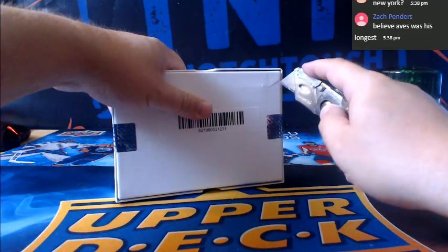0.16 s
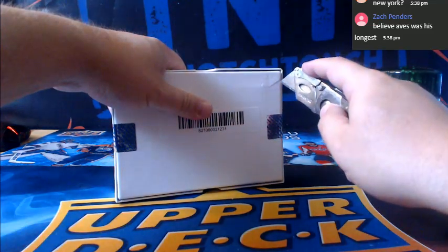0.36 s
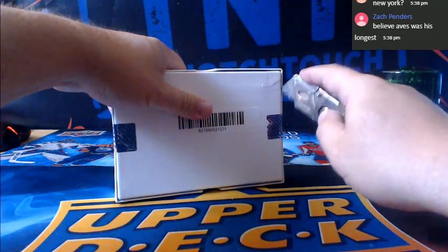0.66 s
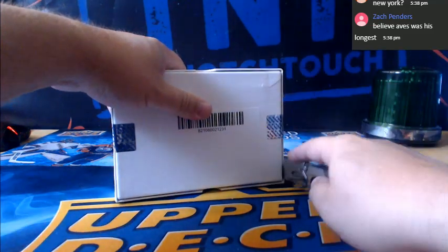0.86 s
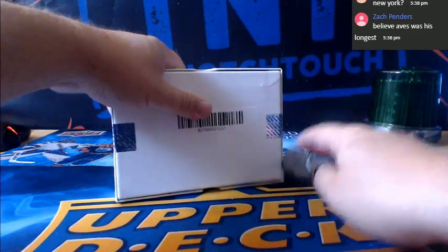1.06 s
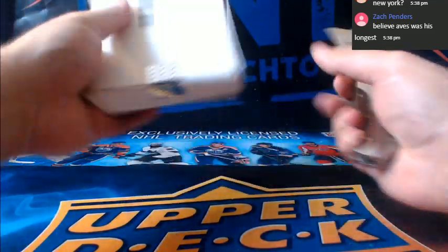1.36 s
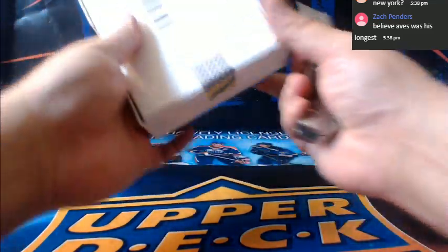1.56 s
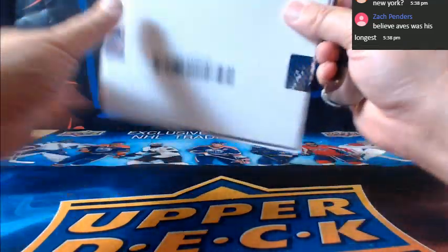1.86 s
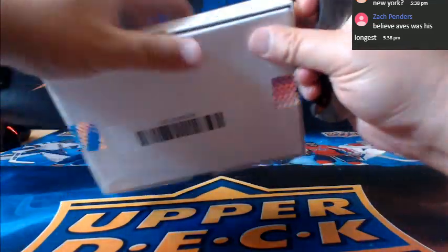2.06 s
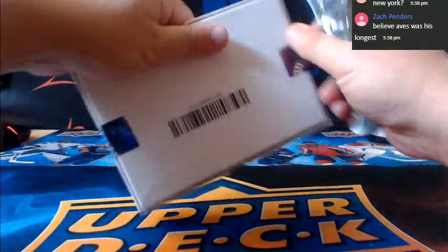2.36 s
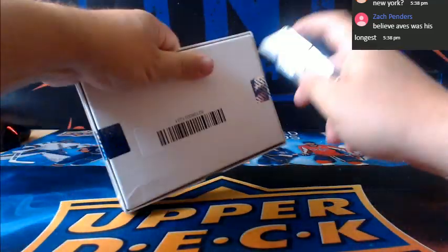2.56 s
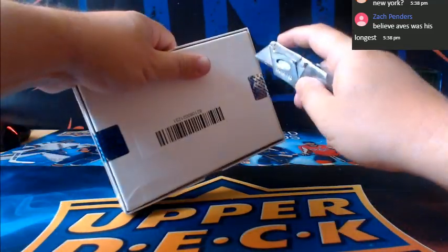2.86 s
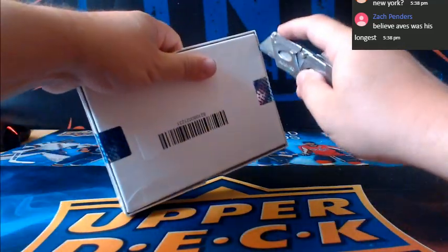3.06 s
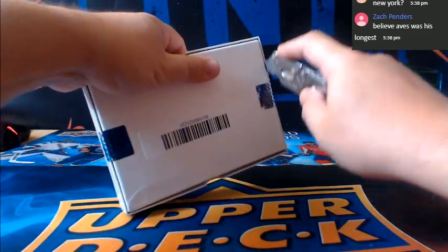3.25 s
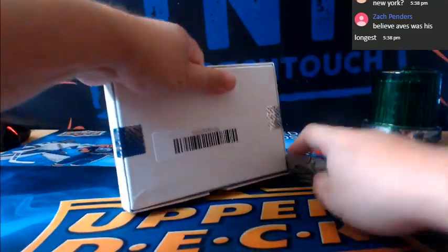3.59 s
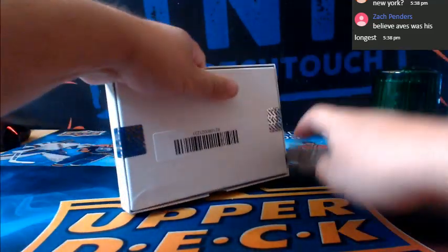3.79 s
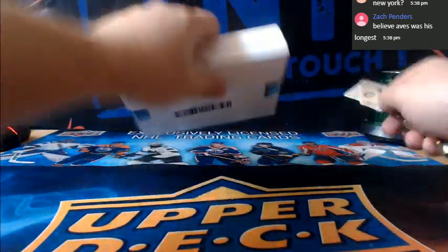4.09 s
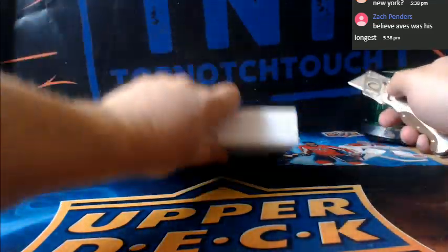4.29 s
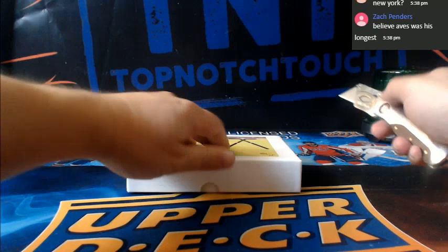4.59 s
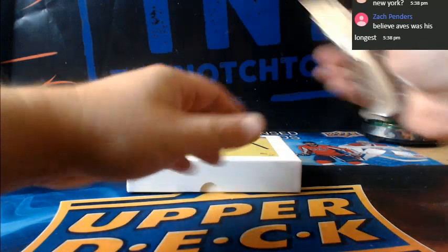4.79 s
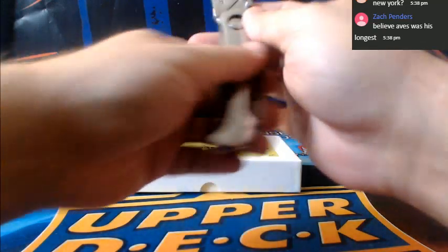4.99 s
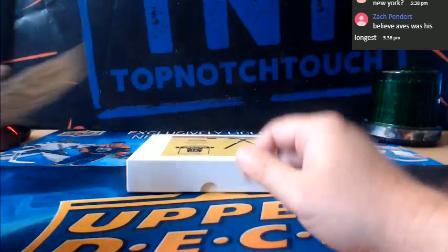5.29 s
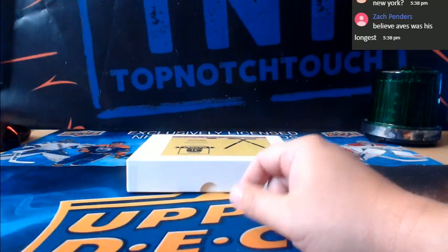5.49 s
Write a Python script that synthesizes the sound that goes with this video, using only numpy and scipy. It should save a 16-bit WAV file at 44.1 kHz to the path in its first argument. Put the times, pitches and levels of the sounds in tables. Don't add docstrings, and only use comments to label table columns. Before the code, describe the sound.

A small, quiet room with low building rumble, a soft fan and microphone hiss, heard close through a webcam. Faint card ticks until 0.5 s, when a blade enters and rasps; at 0.66-0.7 s the tape snaps sharply and the hand thuds against the hollow box, leaving a short creak. From 0.9 to 2.1 s fingers rub and tick on glossy card, with small squeaks, clearest around 1.2-1.35 and 2.0 s. A grip click comes at 2.47 s, then light ticks. From 3.0 s the blade saws the second seal, pressing harder until cracks at 3.3-3.4 s. Soft rubbing and a faint high chirp follow near 3.9 s. The box edge knocks down at 4.13 s and it lands flat with a hollow clap at 4.34 s. Faint steel rattles at 4.5-4.6 s, then near quiet. At 5.57 s the knife hits wood, bouncing at once in a hard, ringing double knock with chatter.

```python
import sys
import numpy as np
from scipy import signal
from scipy.fft import rfft, irfft, next_fast_len
from scipy.io import wavfile
from scipy.ndimage import uniform_filter1d, map_coordinates

SR = 44100
rng = np.random.default_rng(int(sys.argv[2]) if len(sys.argv) > 2 else 0)


def undo_db(level):
    steps = np.asarray(level, float) / 20
    return 10 ** steps


def put_to_file(sound):
    columns = np.atleast_2d(sound).T
    safe = np.clip(columns, -1, 1)
    whole_steps = np.round(safe * 32767)
    wavfile.write(sys.argv[1], SR, whole_steps.astype(np.int16))


N = 248591


def unit(x):
    return x / np.sqrt(np.mean(x ** 2) + 1e-20)


def along(points, hz):
    f, v = np.transpose(points)
    return np.interp(np.log(hz + 1), np.log(f + 1), v)


def wobble(rate):
    return map_coordinates(rng.standard_normal(int(N * rate / SR) + 4), [np.arange(N) * rate / SR])


def filtered(x, response):
    m = next_fast_len(len(x) + SR // 2)
    return irfft(rfft(x, m) * response(np.fft.rfftfreq(m, 1 / SR)), m)[:len(x)]


def body(modes):
    def response(f):
        total = 0
        for k, (centre, width, db) in enumerate(modes):
            damping = 1j * f * width
            total = total + (-1) ** k * undo_db(db) * damping / (centre * centre - f * f + damping)
        return total
    return response


def noise(spectrum, grain_db=0, patchy_db=0):
    grains = rng.standard_normal(N) * undo_db(grain_db * wobble(900))
    z = signal.stft(grains, nperseg=256)[2]
    field = uniform_filter1d(rng.standard_normal(z.shape), size=6, axis=0)
    field = uniform_filter1d(field, size=10, axis=1)
    grit = signal.istft(z * undo_db(patchy_db * unit(field)), nperseg=256)[1][:N]
    return unit(filtered(grit, lambda hz: undo_db(along(spectrum, hz)) * (hz > 0)))


def push(length, t):
    return np.sin(np.pi * np.clip(t / length, 0, 1)) ** 2


def stroke(s, length, attack, sag, release):
    gain, u = np.zeros(N + SR), np.arange(SR // 2) / SR
    fall_db = -sag * np.minimum(u, length) - release * np.maximum(u - length, 0)
    gain[round(s * SR):][:len(u)] = np.clip(u / attack, 0, 1) * undo_db(fall_db)
    return gain[:N]


# frequency in Hz, level in dB per Hz.
RUMBLE_SPECTRUM = [(2, -38), (6, 2.5), (11, 4), (19, -12), (24, -16), (30, -22), (38, -8), (45, -22),
                   (60, -27), (80, -25.5), (110, -65)]
# frequency in Hz, level in dB per Hz.
AIR_SPECTRUM = [(41, -39), (70, -2), (126, 2.5), (169, -6.5), (199, -13.5), (342, -10), (551, -20.5),
                (774, -22), (848, -15), (1560, -26), (1710, -24), (2580, -35.5), (7650, -39), (13200, -47),
                (15800, -60)]


def room_tone():
    rumble = undo_db(-40) * noise(RUMBLE_SPECTRUM)
    air_db = -57.5 + 0.67 * wobble(2.82)
    return rumble + undo_db(air_db) * noise(AIR_SPECTRUM)


# frequency in Hz, time to fall 60 dB in seconds.
ROOM_DECAY = [(150, 0.4), (1000, 0.23), (4000, 0.22), (12000, 0.12)]


def walls(x):
    hz, t, z = signal.stft(rng.standard_normal(SR // 2), SR, nperseg=256)
    fading = z * undo_db(-60 * t / along(ROOM_DECAY, hz)[:, None])
    tail = signal.istft(fading, SR, nperseg=256)[1]
    delayed = np.pad(x, (150, 0))
    echo = signal.fftconvolve(delayed, tail / np.linalg.norm(tail))[:N]
    return filtered(echo, lambda f: (1j * f / (160 + 1j * f)) ** 2)


DROP_TIMES = [
    5.5676,
    5.60385,
]
# ring in dB, crack in dB, contact length in seconds.
DROP_BLOWS = [
    (-10.5, -25, 0.00041),
    (-9.5, -20, 0.00026),
]
# frequency in Hz, width in Hz, level in dB.
DESK_MODES = [
    [(221, 70, -8), (474, 160, -5), (520, 60, -10), (624, 45, -10), (816, 64, -2), (1013, 21, -5),
     (1093, 16, -5.5), (1312, 44, 2), (1740, 220, -7.5), (2000, 170, -13), (2530, 220, -21),
     (3350, 270, -6), (4340, 510, -12), (6000, 800, -19)],
    [(241, 74, -3), (460, 120, -13), (634, 59, -6.5), (953, 44, -0.5), (1130, 53, -7), (1234, 86, 1),
     (1410, 74, -0.5), (1670, 140, -6), (2005, 130, -3), (2620, 390, -8), (3070, 170, -8),
     (4320, 500, -8.5), (5300, 1700, -7), (5900, 180, -2)],
]
# delay in seconds, level in dB against the blow.
ROCKING_TOUCHES = [
    [(0, -3.5), (.0002, -3), (.0008, -7), (.0029, -2.5), (.0065, -8.5)],
    [(0, -3.5), (.0002, -7), (.0007, -6), (.0017, -4), (.0035, -6.5), (.0045, -9.5), (.01, -23),
     (.015, -11)],
]


def knife_drop():
    out, t = np.zeros(N + SR), np.arange(SR // 4) / SR
    blows = zip(DROP_TIMES, DROP_BLOWS, DESK_MODES, ROCKING_TOUCHES)
    for s, (db, crack_db, contact), wood, touches in blows:
        grit = rng.standard_normal((2, len(t)))
        force = sum(undo_db(weaker) * push(contact, t - late) for late, weaker in touches)
        force = force / contact * 0.0019 + 0.25 * grit[0] * undo_db(-60 * t / 0.021)
        together = lambda f: sum(body([mode])(f) for mode in wood)
        fade = undo_db(-60 * t / 0.02) + 0.066 * undo_db(-60 * t / 0.044)
        chatter = filtered(grit[1] * fade, body([(4680, 14000, 1)]))
        ring = filtered(force, together)
        out[round(s * SR):][:len(t)] += undo_db(db + 3.0) * ring + undo_db(crack_db) * chatter
    return out[:N]


# start in seconds, clack in dB, length in seconds, then two parts struck hardest in Hz.
RATTLES = [(2.312, -74, 0.0087, 6100, 6100), (2.473, -52, 0.005, 9100, 11700),
           (2.4836, -68, 0.0047, 6110, 11400), (4.474, -60.5, 0.008, 10300, 9400),
           (4.486, -67.5, 0.012, 10300, 6500), (4.579, -54.5, 0.009, 3960, 7800),
           (4.591, -56.5, 0.0041, 4660, 7400), (4.588, -65, 0.0055, 12200, 10300),
           (4.608, -72, .012, 4310, 7500), (4.988, -79, 0.0057, 6100, 6100),
           (5.574, -53, 0.0018, 6150, 11500), (5.581, -56, 0.0037, 6150, 9200)]
# frequency in Hz, level in dB, time to fall 60 dB in seconds.
STEEL_NOTES = [(3530, -3, .06), (4050, 0, .06), (4310, -4, .08), (4830, -3, .07), (5170, -6, .08),
               (5560, -6, .08), (6110, -1, .09), (6560, -6, .07), (7500, 0, .08), (8400, -3, .07),
               (9200, -5, .05), (10300, 1, .12), (11500, -4, .09), (12200, -3, .08)]


def knife_parts():
    out, t = np.zeros(N + SR), np.arange(SR // 4) / SR
    for s, db, length, *struck in RATTLES:
        fade = np.where(t < length, 1, 0.17 * undo_db(-60 * t / 0.11))
        shower = rng.standard_normal(len(t)) ** 3 * fade
        near = []
        for f, level, t60 in STEEL_NOTES:
            away = min(np.log2(f / hz) ** 2 for hz in struck)
            near.append((f, 5.7 / t60, level - min(160 * away, 28)))
        ring = 0.27 * unit(filtered(shower, body(near)))
        clack = filtered(shower, body([(hz, .5 * hz, 0) for hz in struck]))
        clack = filtered(clack, lambda f: f ** 4 / (f ** 4 + 1100.0 ** 4))
        out[round(s * SR):][:len(t)] += undo_db(db + 1.5) * ring + undo_db(db) * clack
    return out[:N]


# start in seconds, blow in dB, table in dB, contact length in seconds, crack in dB.
LANDING_BLOWS = [
    (0.6956, -19, -46, 0.00068, -57.5),
    (2.4735, -30.5, -64, 0.0049, -71),
    (2.485, -45, -71, 0.0047, -75),
    (4.1281, -18.5, -56, 0.00011, -39),
    (4.1288, -18, -52.5, 0.00088, -60),
    (4.1326, -13, -41, 0.00073, -39),
    (4.3194, -26, -55.5, 0.00048, -61),
    (4.336, -47, -45, 0.00046, -49),
    (4.3403, -15, -33.5, 0.00065, -40.5),
]
# frequency in Hz, width in Hz, level in dB.
EDGE_MODES = [(246, 20, -5), (359, 31, 0.5), (657, 64, -4), (1067, 127, -8.5), (1790, 120, -9),
              (2390, 160, -1), (3160, 420, -8.5)]
# frequency in Hz, width in Hz, level in dB.
FLAT_MODES = [(300, 133, -7.5), (640, 110, -7.5), (800, 340, -11.5), (1150, 110, -12), (1740, 110, -12),
              (2300, 250, -18), (3350, 430, -8.5)]
# frequency in Hz, width in Hz, level in dB.
TABLE_MODES = [(78, 4.5, 2), (133, 8.5, 5), (218, 25, -13), (155, 20, -7), (270, 20, -15), (30, 12, -7)]


def landing():
    blows, thuds, cracks = np.zeros((3, N))
    t = np.arange(SR // 20) / SR
    for s, db, table_db, contact, crack_db in LANDING_BLOWS:
        i = round(s * SR)
        blows[i:][:len(t)] += undo_db(db + 11.5) * push(contact, t)
        thuds[i:][:len(t)] += undo_db(table_db + 30.5) * push(0.002, t)
        cracks[i:][:len(t)] += undo_db(crack_db - 60 * t / 0.037) * rng.standard_normal(len(t))
    flat = np.arange(N) > 4.3 * SR
    box = filtered(blows * ~flat, body(EDGE_MODES)) + filtered(blows * flat, body(FLAT_MODES))
    table = filtered(thuds, body(TABLE_MODES))
    return box - table + filtered(cracks, body([(3500, 2100, 0)]))


# start in seconds, frequency in Hz, level in dB, time to fall 60 dB in seconds.
PANEL_NOTES = [(.555, 3500, -50, .05), (.6605, 760, -30, 0.042), (0.6612, 1830, -30, 0.028),
               (0.6939, 1784, -35, .04), (.697, 386, -36, 0.12), (.706, 1150, -34, .06),
               (.72, 1080, -35, .06), (.755, 1010, -43, .06), (.719, 382, -33, 0.13),
               (1.046, 934, -42.5, 0.042), (1.052, 640, -44.5, 0.074), (1.076, 910, -44, 0.044),
               (1.18, 800, -38, 0.047), (1.205, 418, -47, 0.12), (1.356, 1190, -46, 0.14),
               (1.417, 212, -41, .08), (1.953, 1286, -49, 0.065), (1.97, 1292, -48.5, 0.054),
               (2.055, 649, -43, 0.091), (2.089, 431, -50, .1), (2.474, 1910, -44, 0.03),
               (3.2325, 5000, -56, 0.0085), (3.308, 1240, -36.5, .04), (3.309, 1800, -38, 0.033),
               (3.312, 800, -40, 0.046), (3.3635, 770, -26, .045), (3.363, 2000, -28.5, 0.027),
               (3.379, 1200, -36.5, .06), (3.388, 1130, -37, .06), (3.412, 1133, -38, .06),
               (3.405, 1827, -29, 0.039), (3.406, 730, -41, .05), (3.414, 335, -41.5, 0.14),
               (4.131, 4540, -35, 0.012), (4.143, 2450, -44, .03), (4.161, 344, -30.5, 0.047),
               (4.168, 2000, -41.5, 0.027), (4.332, 1740, -43, .04), (4.345, 1720, -35, 0.035)]


def panels():
    out, t = np.zeros(N + SR), np.arange(SR // 6) / SR
    rise = 1 - np.exp(-t / 0.00061)
    for s, hz, db, t60 in PANEL_NOTES:
        t60 = min(t60, 70 / hz)
        note = rise * np.sin(2 * np.pi * hz * t)
        out[round(s * SR):][:len(t)] += undo_db(db - 60 * t / t60) * note
    return out[:N]


# start in seconds, length in seconds, pressure in dB, brightness in dB.
FINGER_SLIDES = [(0.896, 0.04, -62, -2.5), (1.028, 0.056, -57.5, -3), (1.152, 0.097, -58.5, 1.5),
                 (1.256, 0.11, -59.5, 1.5), (1.31, 0.035, -55.5, 5.5), (1.35, 0.025, -57, -8),
                 (1.4, 0.091, -64.5, 5), (1.462, 0.059, -59, 1.5), (1.588, 0.07, -62.5, 4.5),
                 (1.664, 0.3, -68.5, -11), (1.938, 0.04, -66.5, 6), (1.999, 0.077, -58.5, 2.5),
                 (2.085, 0.081, -67, 7.5), (2.381, 0.016, -76, -21), (2.743, 0.053, -71.5, -3),
                 (2.849, 0.036, -61.5, 4), (3.609, 0.086, -61.5, 1), (3.7, 0.081, -73, 5.5),
                 (3.899, 0.1, -59.5, 0.5), (4.261, 0.055, -64.5, 6), (4.311, 0.019, -47.5, -7.5),
                 (4.451, 0.027, -66, 10.5), (4.783, .03, -79, 11), (5.342, .03, -71.5, 4),
                 (5.376, 0.053, -77, -11)]
# start in seconds, length in seconds, pressure in dB, brightness in dB.
BLADE_STROKES = [
    (0.51, 0.09, -54, -0.5),
    (0.611, 0.064, -53, 2.5),
    (0.67, 0.016, -41, 7),
    (2.992, 0.14, -68, 5.5),
    (3.103, 0.08, -64.5, 3.5),
    (3.186, 0.1, -57, 1.5),
    (3.294, 0.093, -52.5, 2.5),
    (3.375, 0.034, -40.5, 1),
]
# start in seconds, first level in dB, brightness in dB.
CREAKS = [
    (.715, -48, -2.5),
    (3.425, -52, -1.5),
    (4.141, -51.5, -3),
    (4.355, -68, -11),
    (4.6, -63.5, 5),
]
# frequency in Hz, level in dB per Hz.
DRONE_SPECTRUM = [(120, -50), (200, -8.5), (343, -14.5), (486, -19.5), (646, -6.5), (1800, -20),
                  (2500, -74), (5500, -120)]
# frequency in Hz, level in dB per Hz.
SCRAPE_SPECTRUM = [(1300, -1.5), (1800, 3.5), (2500, -4.5), (4500, -1.5), (6500, -4), (9500, -14)]
# frequency in Hz, level in dB per Hz.
HISS_SPECTRUM = [(3500, -41), (5500, -5), (7500, 2), (11500, 1.5), (15800, -5)]


def rubbing():
    attack = 0.038
    gestures = [(stroke(s, length, attack, 28, 498), db, bright)
                for s, length, db, bright in FINGER_SLIDES + BLADE_STROKES]
    gestures += [(stroke(s, 0, attack, 0, 182), db, bright) for s, db, bright in CREAKS]
    drone, scrape, hiss = np.zeros((3, N))
    for gain, db, bright in gestures:
        drone += undo_db(db + 2 - bright) * gain
        scrape += undo_db(db) * gain
        hiss += undo_db(db - 7 + 1.42 * bright) * gain
    clumps = wobble(76)
    drone = drone * undo_db(1.5 * clumps) * noise(DRONE_SPECTRUM, grain_db=2.5, patchy_db=3.0)
    scrape = scrape * undo_db(0.54 * clumps) * noise(SCRAPE_SPECTRUM, grain_db=-2.0, patchy_db=3.0)
    hiss = hiss * undo_db(1.0 * clumps) * noise(HISS_SPECTRUM, grain_db=2.5, patchy_db=2.5)
    return drone + scrape + hiss


def slipping(rows, scatter, attack, sag):
    t, rate, gain = np.arange(N) / SR, np.zeros(N), np.zeros(N)
    for s, length, first_hz, last_hz, db in rows:
        u = np.clip((t - s) / length, 0, 1)
        bulge = 1 + 0.084 * np.sin(np.pi * u)
        rate = np.where(t >= s, (first_hz + (last_hz - first_hz) * u) * bulge, rate)
        gain = gain + undo_db(db) * stroke(s, length, attack, sag, 810)
    return np.cumsum(rate * (1 + scatter * wobble(300))) / SR, gain


# time in seconds, scatter as a share of the slip rate.
SLIP_SCATTER = [(1.2, .045), (1.27, .02), (1.38, .022), (1.45, .07), (1.96, .03), (2.03, .08), (3.96, .012)]
# start in seconds, length in seconds, first and last slips a second, level in dB.
LID_SQUEAKS = [
    (1.178, 0.039, 400.5, 410.6, -63),
    (1.285, 0.051, 300, 344.3, -59.5),
    (1.336, 0.0122, 345, 296.6, -66.5),
    (1.945, 0.041, 422, 428.2, -83),
    (2.006, 0.033, 424, 384, -62.5),
    (2.05, 0.025, 308.4, 345.4, -67.5),
    (2.085, 0.023, 443, 419, -72.5),
    (3.937, 0.03, 810, 642, -68.5),
]
# start in
# seconds, length in seconds, first and last slips a second, level in dB.
RASP_SLIDES = [
    (1.295, 0.057, 309.8, 349.6, -56),
    (1.345, 0.021, 352.5, 302.5, -57.5),
    (1.425, 0.0082, 497, 484, -65),
    (1.455, 0.023, 566, 463, -60),
    (2.03, 0.11, 417, 197, -84.5),
]
# start in seconds, length in seconds, first and last slips a second, level in dB.
PALM_DRAGS = [
    (1.172, 0.036, 421, 403, -65.5),
    (1.205, 0.038, 378, 398, -65),
    (1.26, 0.021, 280, 300, -72),
]
# frequency in Hz, width in Hz, level in dB.
LID_MODES = [(372, 55, 7.5), (690, 180, 9.5), (1230, 113, 8), (1800, 250, -12), (3530, 250, -26)]
# frequency in Hz, level in dB per Hz.
RASP_SPECTRUM = [(2500, -12.5), (3600, -10), (4000, -1.5), (4600, 4), (5200, -1), (5900, -0.5),
                 (6500, -12.5), (10000, -16.5), (16000, -21)]
# frequency in Hz, level in dB per Hz.
PALM_SPECTRUM = [(1200, -24), (1800, -5), (2500, -9), (3300, -2), (4400, -6), (5200, -14), (9000, -30)]


def squeaks():
    scatter = np.interp(np.arange(N) / SR, *np.transpose(SLIP_SCATTER))
    phase, tone = slipping(LID_SQUEAKS, scatter, 0.0069, 26)
    steps = np.floor(phase) + 0.14 * np.floor(phase + .5)
    slips = np.diff(steps, prepend=0) * undo_db(20 * scatter * wobble(370))
    soft = lambda f: body(LID_MODES)(f) / (1 + 1j * f / 2500) ** 2
    out = filtered(slips * tone * undo_db(43.5), soft)
    for rows, colour, snap in ((RASP_SLIDES, RASP_SPECTRUM, 5.9), (PALM_DRAGS, PALM_SPECTRUM, 4)):
        phase, rasp = slipping(rows, 0.17 * scatter, .022, -88)
        puffs = np.exp(-4 * (phase % 1)) * rng.standard_normal(N)
        puffs = puffs + snap * np.diff(np.floor(phase), prepend=0)
        out = out + rasp * undo_db(7.5) * unit(filtered(puffs, lambda hz: undo_db(along(colour, hz))))
    return out


# start in seconds, crack in dB,
# table in dB against the crack, time to fall 60 dB in seconds, centre in Hz.
BLADE_KNOCKS = [
    (0.5598, -42.5, -6, 0.13, 3340),
    (0.66, -16, -27, 0.028, 6340),
    (0.694, -19, 1, 0.076, 4000),
    (2.387, -58.5, 17.5, 0.039, 2900),
    (2.472, -29, -18, 0.078, 9500),
    (3.3091, -32, -7.5, 0.043, 2750),
    (3.3634, -18.5, -24, 0.053, 2420),
    (3.4058, -32.5, 9, 0.037, 2000),
]
# start in seconds, crack in dB, box in dB against the crack, centre in Hz.
TICKS_AND_SNAPS = [(0.0348, -50, -9.5, 2690), (0.163, -54, -36, 2500), (0.253, -53, -25, 7890),
                   (0.395, -52, -36, 5500), (0.544, -41.5, -10, 7010), (0.882, -55, -8.5, 3070),
                   (0.954, -46.5, -30, 3870), (1.0479, -40, -10, 5600), (1.0784, -50, -6, 6600),
                   (1.179, -48, -4, 3210), (1.4186, -36, -12, 11900), (1.715, -51.5, -0.5, 11440),
                   (1.761, -50, -6, 9050), (1.8484, -52.5, 0, 3184), (1.958, -54, -4, 4730),
                   (2.011, -44, -7.5, 11300), (2.312, -55, -27, 9060), (2.7448, -45, -17, 8270),
                   (2.885, -44, -10, 8800), (3.031, -54, -26, 3570), (3.079, -53, -5.5, 4270),
                   (3.11, -40, -25, 8400), (3.2238, -43.5, -1, 7510), (3.269, -43, -2, 6000),
                   (3.6567, -44, -7.5, 12040), (3.971, -51, -33, 4150), (4.9893, -51.5, -29, 6100),
                   (0.53, -62, -11, 3000), (.598, -54, -25, 10900), (.613, -54, -25, 11000),
               (0.6615, -24.5, -14, 4500), (0.6725, -31, -15, 7000), (0.6966, -20, -26, 4000),
               (0.7009, -23.5, -10, 9100), (0.703, -36, -28, 7000), (0.712, -44, -23, 5000),
               (1.371, -39, -22, 5200), (1.199, -52, 4, 3300), (2.022, -55, 2, 5000),
               (1.973, -57, -20, 5500), (3.3653, -23.5, -19, 1500), (1.627, -42, -33, 11600),
               (1.6375, -40, -34, 11900), (1.697, -52, -3, 11500), (1.797, -50.5, -2, 6000),
               (1.907, -55, -1.5, 11500), (2.392, -46.5, -14, 7000), (2.4766, -36, -26, 3800),
               (3.212, -52, -15, 7500), (3.261, -45, -6, 7900), (3.277, -41, -18, 9000),
               (3.32, -29.5, -18, 12000), (3.375, -30, -8, 13500), (3.4085, -24.5, -16.5, 13000),
               (3.422, -49, -17, 7000), (3.7624, -56, -25, 12500), (3.907, -57, -27, 9000),
               (4.328, -54, -15, 3500), (5.6064, -19.5, -4, 3030), (5.615, -38, -8, 6000),
               (5.619, -35, -4, 10000)]
# frequency in Hz, width in Hz, level in dB.
BOX_MODES = [(380, 49, 4.5), (680, 160, 4), (774, 113, 7.5), (1016, 154, 4), (1245, 120, 2.5),
             (1870, 120, -1), (2316, 64, -5), (3100, 110, -9.5)]


def taps():
    out, thuds, t = np.zeros(N + SR), np.zeros(N + SR), np.arange(SR // 6) / SR
    contacts = [(s, db, -14.5, table_db, t60, 0.42, hz) for s, db, table_db, t60, hz in BLADE_KNOCKS]
    contacts += [(s, db, box_db, box_db - 5.5, 0.059, 0.19, hz)
                 for s, db, box_db, hz in TICKS_AND_SNAPS]
    dull = np.exp(-2 * np.pi * 5000 / SR)
    for s, db, box_db, table_db, t60, tail, hz in contacts:
        i = round(s * SR)
        burst = rng.standard_normal((3, len(t))) * (1 - np.exp(-t / 0.00048))
        colour = body([(hz, 1.12 * hz, 0), (9000, 30000, -9)])
        spot = [(f * (1 + 0.038 * rng.normal()), width, level + rng.normal(0, 0.87))
                for f, width, level in BOX_MODES]
        trail = signal.lfilter([1], [1, -dull], burst[2]) * tail * undo_db(-60 * t / max(t60, .01))
        crack = filtered(burst[0] * 3.19 * undo_db(-60 * t / 0.0063) + trail, colour)
        knock = filtered(burst[1] * undo_db(-60 * t / 0.015), body(spot))
        out[i:][:len(t)] += undo_db(db - 1.0) * crack + undo_db(db + box_db + 19.5) * knock
        thuds[i + 20] += undo_db(db + table_db + 50.5)
    return out[:N] - filtered(thuds[:N], body(TABLE_MODES))


def scene():
    near = taps() + landing() + knife_parts() + knife_drop()
    skin = squeaks()
    echo = undo_db(-7.0) * walls(near + undo_db(-6) * skin)
    return (near + skin + panels() + echo + rubbing() + room_tone())[None]


# start in seconds, length in seconds, treble fades above this Hz.
TREBLE_GAPS = [(.005, 0.02, 2220), (0.071, 0.014, 2200), (0.918, 0.014, 2200), (2.506, 0.014, 2180),
               (2.716, 0.014, 2300), (2.822, 0.012, 2220), (3.249, 0.005, 2240), (3.956, 0.008, 2560),
               (4.036, 0.007, 2210), (4.567, 0.011, 1260), (4.911, 0.016, 2300), (5.126, 0.01, 1700)]
# start in seconds, level in dB, then two tones in Hz.
FLICKER_TONES = [
    (.912, -67, 4380, 7500),
    (.915, -71, 2950, 2000),
    (2.496, -69, 4720, 1850),
    (2.499, -65, 6150, 11300),
    (3.243, -72, 8900, 6460),
    (3.945, -63, 2350, 5400),
    (4.563, -74, 4860, 8550),
    (4.564, -74, 10600, 12100),
    (4.565, -75, 6100, 13000),
    (5.12, -80, 5600, 9300),
]


def treble_gaps(x):
    out = x.copy()
    for s, length, edge_hz in TREBLE_GAPS:
        i = max(round((s - .004) * SR), 0)
        t = np.arange(round((length + 0.008) * SR)) / SR
        to_edge = np.minimum(t, t[-1] - t)
        hole = np.sin(np.pi / 2 * np.clip(to_edge / 0.008, 0, 1)) ** 2
        wide = x[max(i - 400, 0):i + len(t) + 400]
        treble = filtered(wide, lambda hz: 1 / (1 + (edge_hz / (hz + 1)) ** 16))
        out[i:i + len(t)] -= hole * treble[min(i, 400):][:len(t)]
    u = np.arange(round(0.037 * SR)) / SR
    for s, db, *tones in FLICKER_TONES:
        tone = sum(np.sin(2 * np.pi * hz * u) for hz in tones)
        out[round(s * SR):][:len(u)] += undo_db(db) * np.sin(np.pi * u / u[-1]) * tone
    return out


def roll_off(x):
    return signal.sosfilt(signal.butter(12, 16770, fs=SR, output="sos"), x)


def record(dry):
    rounded = dry[0] / (1 + (dry[0] / .85) ** 4) ** .25
    limited = filtered(rounded, lambda hz: .03 + .97 / (1 + (hz / 15800) ** 200))
    return roll_off(treble_gaps(limited)[None])


dry = scene()
out = record(dry)
put_to_file(out)
```